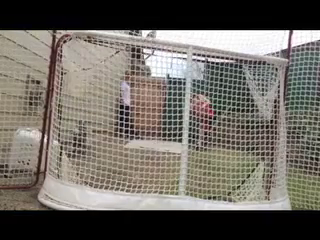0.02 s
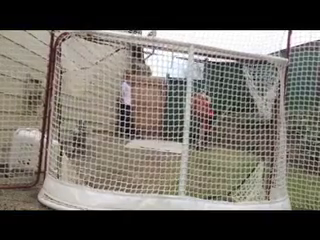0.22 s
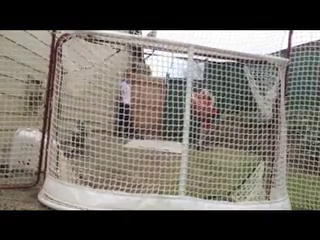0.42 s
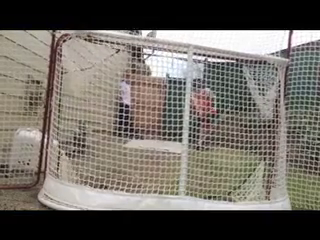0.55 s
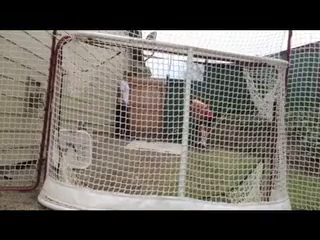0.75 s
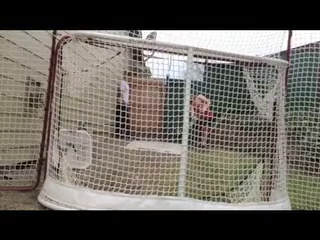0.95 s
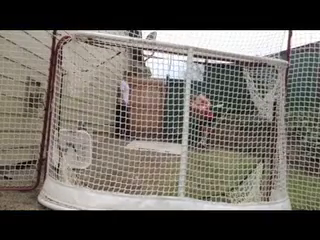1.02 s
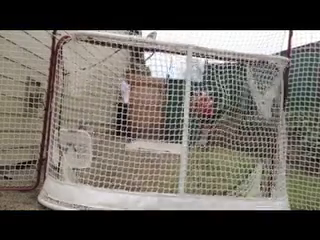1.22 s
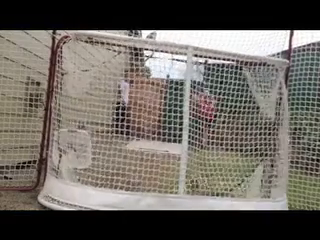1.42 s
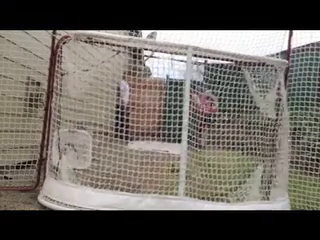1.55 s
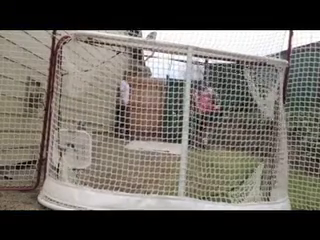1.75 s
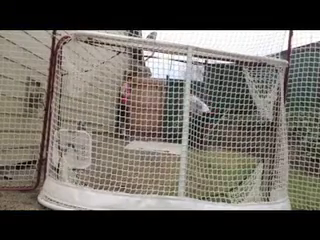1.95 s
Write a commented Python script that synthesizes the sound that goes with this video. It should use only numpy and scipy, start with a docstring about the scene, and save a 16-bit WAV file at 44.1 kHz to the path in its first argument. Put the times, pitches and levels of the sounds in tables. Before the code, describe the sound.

Two sharp cracks of a puck hitting ringing goal pipes in a backyard.

```python
"""A stick scrapes over a plastic pad and a puck cracks into a steel goal: two backyard hockey shots. Each
impact sets the pipes ringing in beating pairs of modes; the puck knocks on net, target and ground. Walls and
fence reflect the blows. Outdoor air hisses throughout. At 0.766 s the scene changes: the first shot's ringing
stops, and a far motor hums under the second shot. A limiter ducks the whole sound after each crack."""
import sys
import numpy as np
from scipy import signal
from scipy.fft import rfft, irfft
from scipy.io import wavfile

SR = 44100
rng = np.random.default_rng(int(sys.argv[2]) if len(sys.argv) > 2 else 0)


def generate_wav(sig):
    """Save sig (samples, or channels by samples) to the path in sys.argv[1] as 16-bit PCM at SR."""
    pcm = np.round(np.clip(np.atleast_2d(sig).T, -1, 1) * 32767).astype(np.int16)
    wavfile.write(sys.argv[1], SR, pcm)


N = 88200
T = np.arange(N) / SR
SPLIT_S = 0.766  # the scene changes here: the first shot's ringing stops and a far motor hum is heard
CRACK_RISE_S = 0.0011

# Puck impacts on the frame. Each row: start in seconds, crack level in dB, crack t60 in seconds,
# body pitch in Hz, body level in dB, thump level in dB.
FRAME_HITS = [(0.2145, 4.5, 0.099, 671, -5, -50), (1.2647, 2, 0.11, 421, -5, -8)]


def cracks():
    """Impact excitation: puck on steel gives a broadband crack, a damped hollow note and a low thump."""
    # Spectra of the impact. Each row: frequency in Hz, relative density in dB.
    crack_spectrum = [(60, -51), (150, -27), (300, -9.5), (700, -11), (1020, -9), (1380, -1.5),
                      (1750, -4.5), (2250, -2.5), (2750, -6), (3150, -1.5), (4700, 2.5), (5700, -2),
                      (7000, 0.5), (9000, -3.5), (10200, -12), (11500, -6), (13700, -10.5)]
    thump_spectrum = [(25, 7.5), (60, 2), (120, -15), (300, -1), (600, -7), (1200, 1), (4000, -28)]
    out = np.zeros(N)
    for start, db, t60, body_hz, body_db, thump_db in FRAME_HITS:
        crack = amp(db) * burst(crack_spectrum, t60, CRACK_RISE_S)
        body = np.sin(2 * np.pi * body_hz * T) * fade(t60=0.019) * (1 - np.exp(-T * body_hz))
        thump = amp(thump_db) * burst(thump_spectrum, t60=0.02, rise=CRACK_RISE_S)
        out += delay(crack + amp(body_db) * body + thump, start)
    return out


def pipes():
    """Free vibration: close pairs of pipe modes beat, their strengths set by where the puck lands."""
    # Mode pairs. Each row: frequency in Hz, t60 in seconds, beat rate in Hz,
    # level in dB in the first shot, level in dB in the second.
    mode_pairs = [(1324, 0.65, 2.9, -17, -31), (2244, 3.0, 0.95, -47, -33), (2303, 2.2, 0.9, -60, -43),
                  (2428, 1.8, 0.9, -56, -42), (3580, 0.27, 2, -25, -24), (3820, 0.24, 3, -24, -26),
                  (4567, 0.27, 2, -28, -25), (4837, 0.33, 2, -23, -31), (6514, 0.3, 2, -34, -24),
                  (6660, 0.36, 2, -27, -24), (6922, 0.21, 5, -14, -25), (7265, 0.26, 3, -24, -26),
                  (11526, 0.25, 3, -30, -25)]
    swell = 0.22  # share of a beat over which a pair swells
    mismatch = 0.12  # unequal partners never cancel fully
    out = np.zeros(N)
    for shot, (start, *_) in enumerate(FRAME_HITS):
        ring = np.zeros(N)
        for hz, t60, beat_hz, *shot_db in mode_pairs:
            beating = np.hypot(np.cos(np.pi * (beat_hz * T - swell)), mismatch)
            tone = np.sin(2 * np.pi * (hz * T + rng.random()))
            ring += amp(shot_db[shot]) * fade(t60) * beating * tone
        out += delay(ring * (1 - np.exp(-T / CRACK_RISE_S)), start) * same_side(start)
    return out


def knocks():
    """Damped impacts: the puck meets net, target and ground with a dull thud and a plastic clack."""
    # Contacts. Each row: start in seconds, thud and clack levels in dB, clack rise and t60 in seconds.
    contacts = [(0.3839, -19.5, -26, 0.0015, 0.045), (1.2508, -29, -25.5, 0.00013, 0.03),
                (1.428, -16.5, -6, 0.01, 0.063), (1.945, -47.5, -41, 0.0048, 0.12)]
    # Spectra of a contact. Each row: frequency in Hz, relative density in dB.
    thud_spectrum = [(30, -40), (110, -26), (230, -2), (480, -3), (900, -2), (1500, -9), (4000, -26.5)]
    clack_spectrum = [(100, -15), (700, -7.5), (1200, -9), (2500, 3.5), (4200, 1), (6500, 2), (10000, -16),
                      (13500, -10)]
    out = np.zeros(N)
    for start, thud_db, clack_db, rise, t60 in contacts:
        thud = amp(thud_db) * burst(thud_spectrum, t60=0.037, rise=0.00013)
        clack = amp(clack_db) * burst(clack_spectrum, t60, rise)
        out += delay(thud + clack, start)
    return out


def stick():
    """Friction and flexure: the scraping blade resonates, and the pad rumbles as it bends."""
    # Blade strokes. Each row: peak time in seconds, level in dB, rise and t60 in seconds,
    # relative level of the blade's resonance in dB.
    scrapes = [(0.017, -47.5, 0.036, 0.32, -16.5), (0.728, -48, 0.011, 0.1, -22),
               (0.806, -42, 0.028, 0.61, -21.5), (0.937, -43.5, 0.013, 0.17, -0.5),
               (0.988, -48, 0.0086, 0.21, -41)]
    # Bends of the pad. Each row: peak time in seconds, level in dB, rise and t60 in seconds.
    flexes = [(0.025, -41.5, 0.085, 0.28), (0.772, -49, 0.011, 0.13), (0.968, -40, 0.016, 0.27),
              (1.001, -31, 0.0097, 0.14), (1.969, -39.5, 0.011, 0.11)]
    # Spectra of friction and pad. Each row: frequency in Hz, relative density in dB.
    friction_spectrum = [(100, -11), (400, -0.5), (1200, -2), (1900, 0), (2500, 2), (4300, 0), (5400, -2),
                         (7200, -1.5), (9800, -12), (13500, -9.5)]
    pad_spectrum = [(40, -32.5), (100, -20.5), (160, 3), (300, -6), (450, 4.5), (650, -4), (850, -7),
                    (1100, -7.5), (1800, -23.5), (5000, -36.5)]
    grit, blade = hiss(friction_spectrum), narrow(hz=4500, width_hz=800)
    scraping = sum(amp(db) * stroke(peak, rise, t60) * (grit + amp(blade_db) * blade)
                   for peak, db, rise, t60, blade_db in scrapes)
    bending = sum(amp(db) * stroke(peak, rise, t60) for peak, db, rise, t60 in flexes)
    return scraping + bending * hiss(pad_spectrum)


def tap():
    """Damped oscillation: the blade lands on the pad with a short hollow note."""
    start, hz, db, t60 = 0.770, 1200, -40, 0.15
    return delay(amp(db) * fade(t60) * np.sin(2 * np.pi * hz * T), start)


def yard(x):
    """Reflection and scattering: walls and fence return smeared echoes and a diffuse tail."""
    # Reverberation bands. Each row: centre in Hz, t60 in seconds, relative level in dB.
    bands = [(150, 0.13, 0.5), (450, 0.17, -5.5), (870, 0.61, 6.5), (1620, 0.69, 2), (3020, 0.61, 4.5),
             (5100, 0.57, 1), (9000, 0.48, 0), (13000, 0.44, 1)]
    # Reflections. Each row: delay in seconds, gain in dB.
    echoes = [(0.046, -16), (0.088, -25.5)]
    tail_db, tail_rise_s = -15, 0.021
    log_hz = np.log(np.fft.rfftfreq(N, 1 / SR) + 1)
    centres = np.log([row[0] for row in bands])
    noise = rfft(rng.standard_normal(N))
    tail = sum(amp(db) * fade(t60) * irfft(noise * np.interp(log_hz, centres, weights), N)
               for (_, t60, db), weights in zip(bands, np.eye(len(bands))))
    tail *= 1 - np.exp(-T / tail_rise_s)
    response = amp(tail_db) * tail / np.linalg.norm(tail)
    for lag, db in echoes:
        slap = rng.standard_normal(N) * fade(t60=0.0083)
        response += delay(amp(db) * slap / np.linalg.norm(slap), lag)
    return signal.fftconvolve(x, response)[:N]


def motor():
    """Random modulation: a far motor's tones waver over its rumble, from SPLIT_S on."""
    # Hum partials. Each row: frequency in Hz, rms level in dB.
    partials = [(145, -65), (175, -55), (232, -56)]
    # Rumble spectrum. Each row: frequency in Hz, relative density in dB.
    rumble_spectrum = [(25, -25), (60, 1), (110, -4), (170, 5.5), (270, 2.5), (500, -5.5), (2000, -44)]
    waver, waver_hz = 0.34, 14
    hum = np.zeros(N)
    for hz, db in partials:
        tone = np.sin(2 * np.pi * hz * T + waver * narrow(0, waver_hz))
        hum += amp(db) * unit(tone + waver * narrow(hz, waver_hz))
    return (hum + amp(-52.5) * hiss(rumble_spectrum)) * (T >= SPLIT_S)


def air():
    """Ambient noise: a broadband outdoor hush that steps up slightly at SPLIT_S."""
    # Outdoor spectrum. Each row: frequency in Hz, relative density in dB.
    air_spectrum = [(25, -44.5), (70, -16), (160, -6), (260, -1.5), (450, -5.5), (1000, 1), (2000, -9),
                    (4000, -15), (7000, -25), (10000, -32.5), (13500, -35)]
    return hiss(air_spectrum) * amp(np.where(T < SPLIT_S, -54, -52))


def amp(db):
    """Decibels to amplitude ratio."""
    return 10 ** (np.asarray(db) / 20)


def unit(x):
    """Normalisation to rms 1."""
    return x / np.sqrt(np.mean(x ** 2) + 1e-20)


def fade(t60):
    """Exponential decay, 60 dB in t60 seconds."""
    return np.exp(-np.log(1000) * T / max(t60, 1e-3))


def delay(x, seconds):
    """Time shift to a later start."""
    return np.concatenate([np.zeros(max(round(seconds * SR), 0)), x])[:N]


def same_side(time):
    """Gate open on the side of SPLIT_S where the given time lies."""
    return (T >= SPLIT_S) == (time >= SPLIT_S)


def stroke(peak, rise, t60):
    """Gated envelope: Gaussian swell, then exponential decay."""
    swell = (np.minimum(T - peak, 0) / rise) ** 2 / 2
    decay = np.log(1000) * np.maximum(T - peak, 0) / t60
    return np.exp(-swell - decay) * same_side(peak)


def colour(x, spectrum):
    """Minimum-phase filter through (Hz, dB) points that keeps the power of white noise."""
    size = 4096
    hz, db = np.transpose(spectrum)
    log_hz = np.log(abs(np.fft.fftfreq(size, 1 / SR)) + 1)
    log_gain = np.log(amp(np.interp(log_hz, np.log(hz), db)))
    taps = np.fft.ifft(np.exp(np.conj(signal.hilbert(log_gain)))).real[:size // 2]
    return signal.oaconvolve(x, taps / np.linalg.norm(taps))[:N]


def hiss(spectrum):
    """Stationary noise with a given spectrum."""
    return colour(rng.standard_normal(N), spectrum)


def burst(spectrum, t60, rise):
    """Transient of a blow: dense vibration that builds up and dies quickly."""
    envelope = fade(t60) * (1 - np.exp(-T / max(rise, 1e-5)))
    x = colour(rng.standard_normal(N) * envelope, spectrum)
    return x * np.linalg.norm(envelope) / np.linalg.norm(x)


def narrow(hz, width_hz):
    """Resonance driven by noise."""
    detuning = 2 * (np.fft.rfftfreq(N, 1 / SR) - hz) / width_hz
    return unit(irfft(rfft(rng.standard_normal(N)) / (1 + detuning ** 2), N))


def scene():
    """Superposition of all sources; only cracks and knocks echo round the yard."""
    hard, light = cracks(), knocks()
    reflected = yard(hard + amp(-1.5) * light)
    return (hard + light + reflected + pipes() + stick() + tap() + motor() + air())[None]


def limiter(x):
    """Gain control: turns down at once on a loud sound and recovers slowly."""
    limit_db, sense_s, recover_db_per_s = -12, 0.0017, 6.5
    pole = np.exp(-1 / (sense_s * SR))
    level_db = 10 * np.log10(signal.lfilter([1 - pole], [1, -pole], x ** 2) + 1e-12)
    recovery = recover_db_per_s * T[:len(x)]
    held_db = np.maximum.accumulate(level_db + recovery) - recovery
    return x * amp(-np.maximum(held_db - limit_db, 0))


def record(dry):
    """Limiting on each side of SPLIT_S separately, then soft saturation and band limiting."""
    ceiling, low_cut_hz, high_cut_hz = 0.58, 100, 13900
    x = np.concatenate([limiter(part) for part in np.split(dry[0], [round(SPLIT_S * SR)])])
    x = ceiling * np.tanh(x / ceiling)
    x = signal.sosfilt(signal.butter(2, low_cut_hz, "high", fs=SR, output="sos"), x)
    lowpass = signal.firwin(511, high_cut_hz, window=("kaiser", 8), fs=SR)
    return signal.oaconvolve(x, lowpass, "same")[None]


dry = scene()
out = record(dry)
generate_wav(out)
```